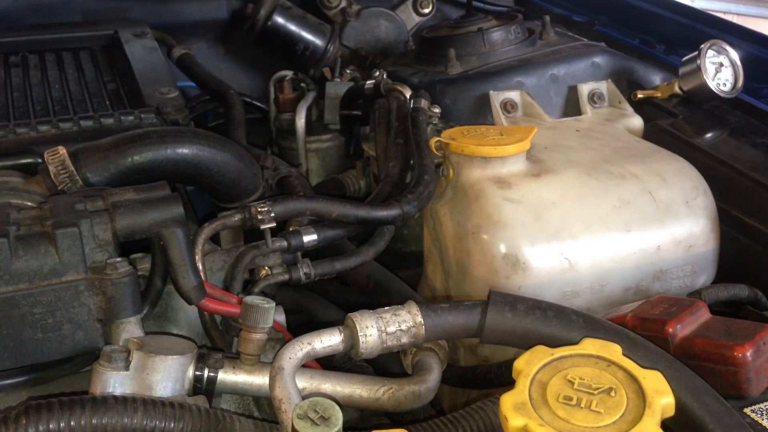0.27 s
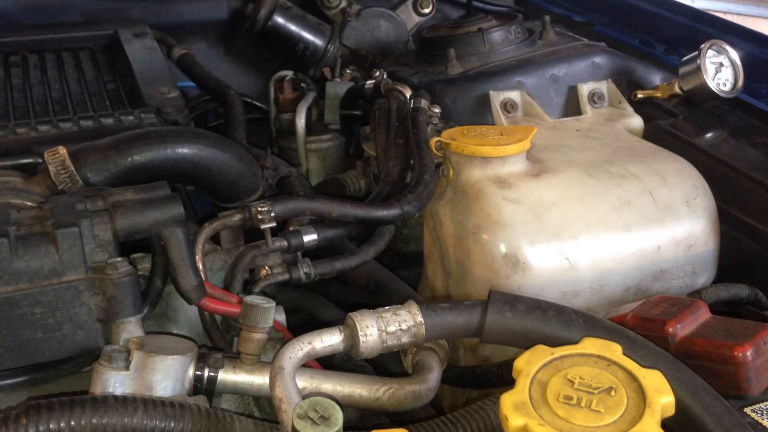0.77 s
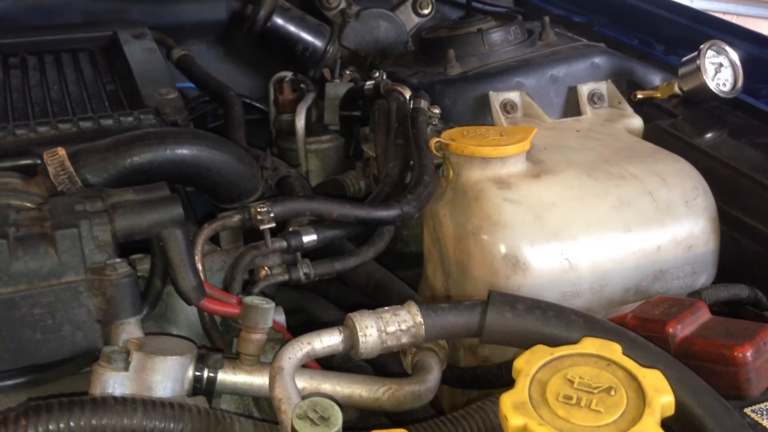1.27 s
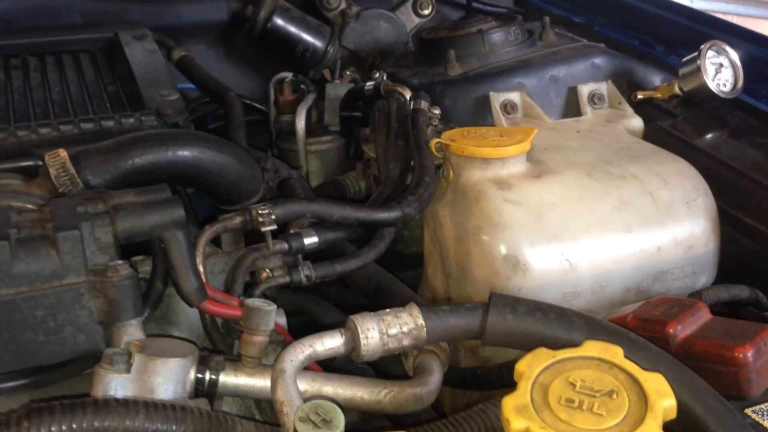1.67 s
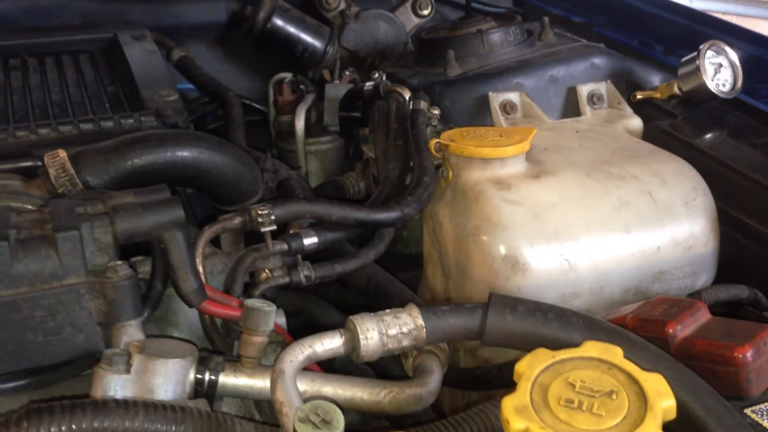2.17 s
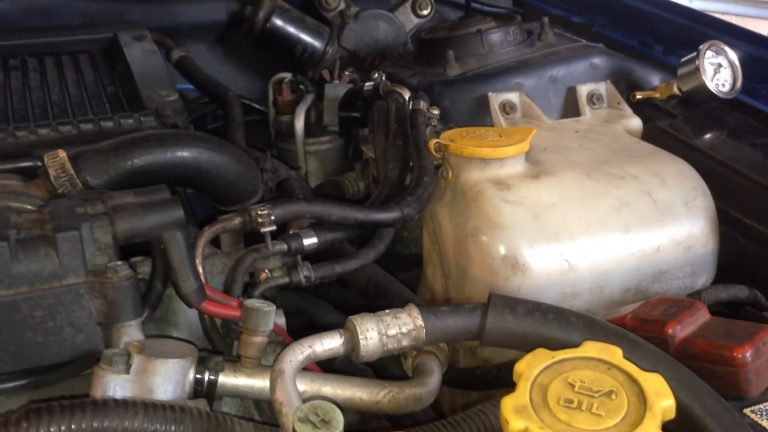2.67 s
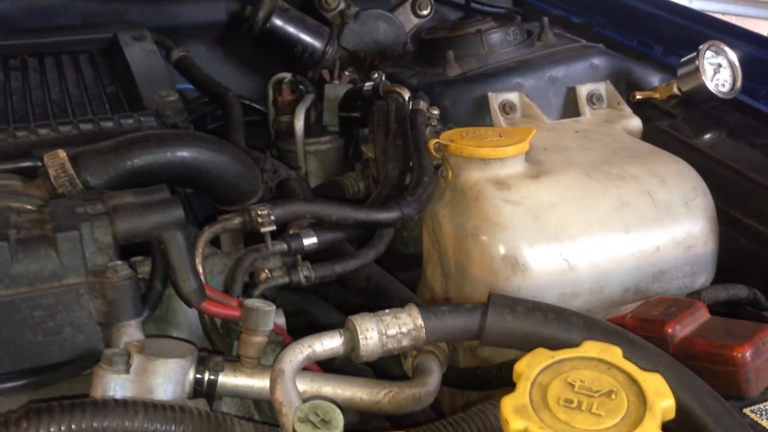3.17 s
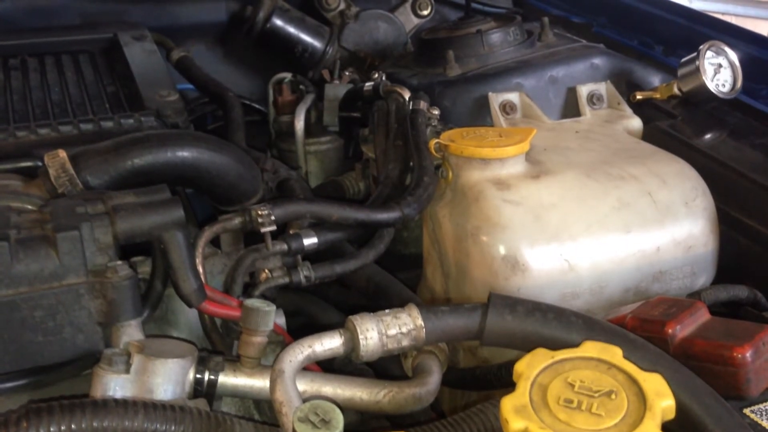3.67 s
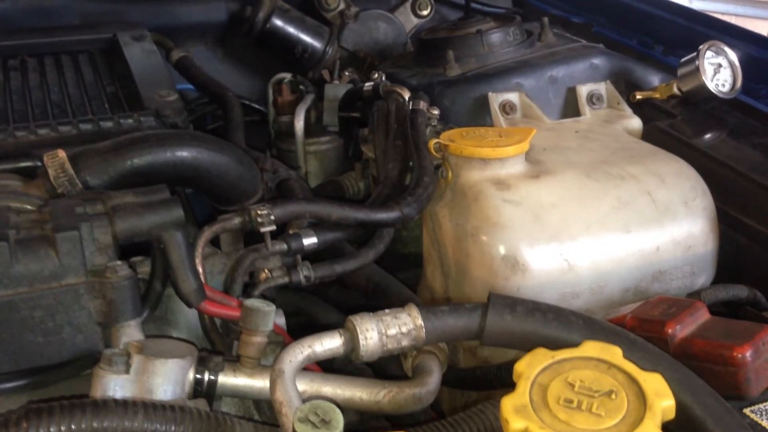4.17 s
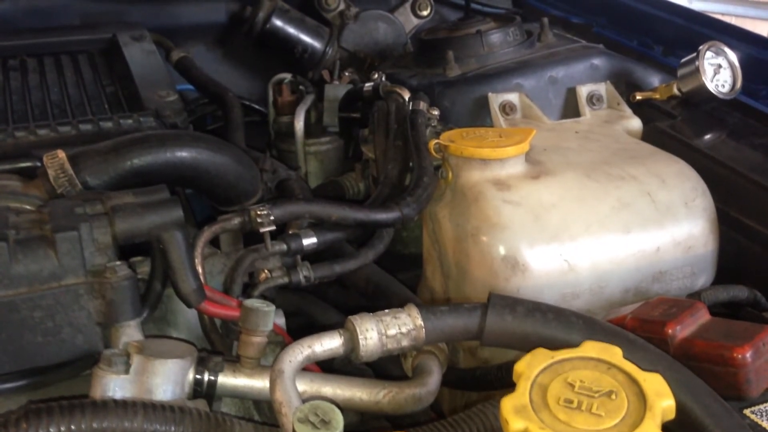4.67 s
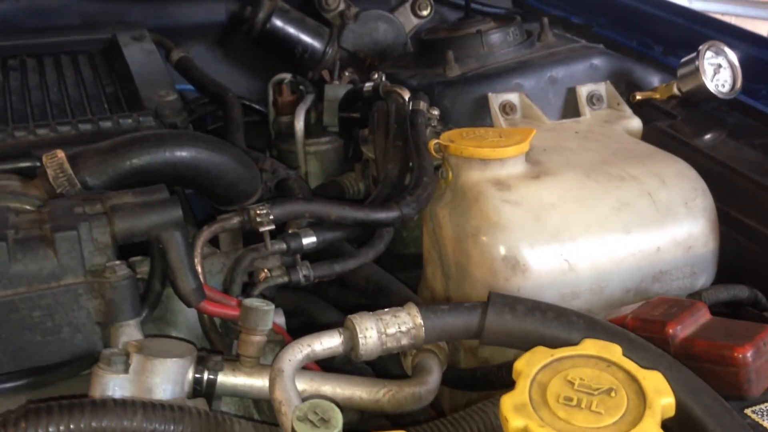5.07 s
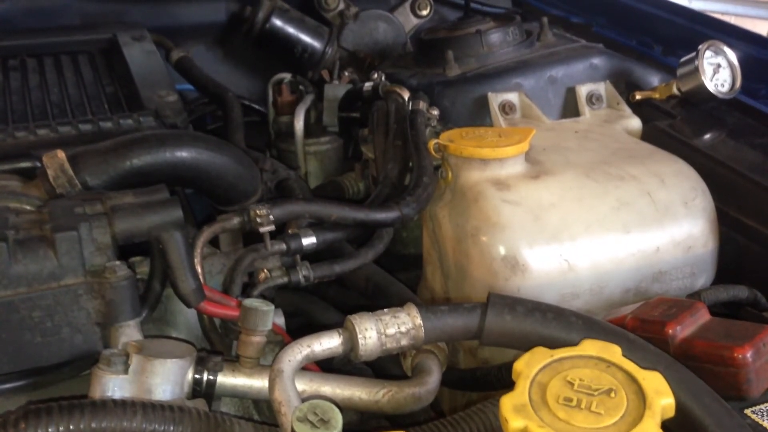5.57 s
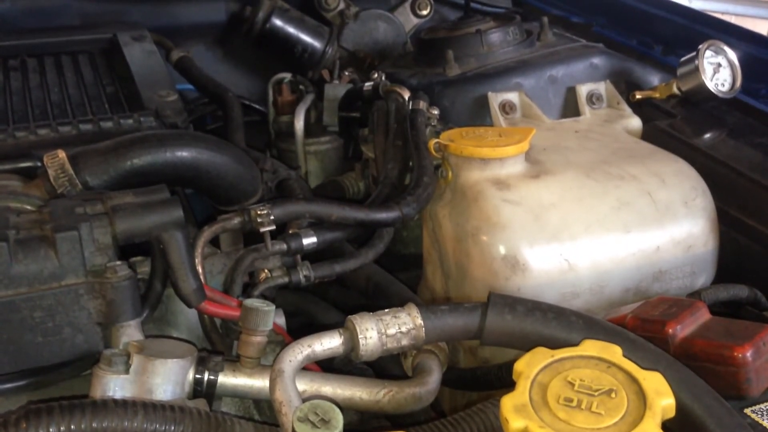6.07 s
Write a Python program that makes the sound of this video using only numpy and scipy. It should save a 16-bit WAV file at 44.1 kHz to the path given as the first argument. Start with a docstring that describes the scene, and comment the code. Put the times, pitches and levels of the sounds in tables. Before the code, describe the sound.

Close in an open engine bay, harsh metallic cranking pulses about six times a second without catching, squeaks a little, then stops.

```python
"""Cranking a car engine that never fires

A starter motor cranks the engine, heard from the open engine bay in a garage. Past each compression
the crank runs ahead: the gears knock across their slack (enveloped impacts), then grind as the motor
takes up the load again (tooth harmonics and scrape noise, coloured by casing rings). Block, body shell
and squeals join in; at the end the pinion lets go and the motor coasts down over the still garage."""
import sys
import numpy as np
from scipy import signal
from scipy.io import wavfile
from scipy.ndimage import uniform_filter1d

SR = 44100
rng = np.random.default_rng(int(sys.argv[2]) if len(sys.argv) > 2 else 0)


def store_pcm(level_fs):
    """Save levels as 16-bit WAV."""
    pcm = np.round(np.clip(level_fs, -1, 1) * 32767).astype(np.int16)
    wavfile.write(sys.argv[1], SR, np.atleast_2d(pcm).T)


N = 278786  # samples

# The compressions. Each row: start in seconds, then nominal levels of knock, grind and block rumble in dB.
COMPRESSIONS = [(.733, -15.5, -14.5, -21), (0.9142, -12.5, -14, -20), (1.084, -14, -16.5, -23.5),
                (1.2546, -16, -15.5, -21.5), (1.4201, -15.5, -14, -21.5), (1.5872, -14.5, -16.5, -22.5),
                (1.7511, -16, -14.5, -22.5), (1.9176, -15.5, -15, -23), (2.0834, -16, -14, -21),
                (2.2471, -13.5, -14, -21), (2.4099, -16.5, -16, -24.5), (2.576, -16, -13.5, -23.5),
                (2.7404, -15, -15, -22), (2.9072, -12.5, -14, -21), (3.069, -12.5, -15.5, -23.5),
                (3.2362, -17, -16, -23.5), (3.4054, -17, -15.5, -22.5), (3.5723, -15, -15, -23.5),
                (3.7395, -15, -14, -22.5), (3.9103, -13.5, -14, -21), (4.0773, -16.5, -14.5, -22),
                (4.2479, -16.5, -13.5, -21.5), (4.4126, -13.5, -15.5, -23.5), (4.5871, -14.5, -14, -21),
                (4.7551, -15, -14.5, -21), (4.9236, -14, -14, -22), (5.0926, -13.5, -14.5, -21.5),
                (5.2669, -14, -15, -21.5), (5.4364, -16, -14, -23), (5.6079, -15.5, -15, -21)]
# The motor after the last compression. Each row: time in seconds, grind level in dB, rumble level in dB.
COAST_DOWN = [(5.686, -30, -30), (5.74, -25, -30.5), (5.79, -33, -40.5), (5.9, -29, -43.5),
              (6.03, -29.5, -51), (6.21, -28, -49.5), (6.32, -31.5, -53)]
TO_FREE_S, FREE_S = 5.74, 5.95  # the gear sound changes to free coasting between these times


def compression_cycle(t):
    """Cyclic loading: each compression slows the crank and loads the teeth, then the crank runs ahead."""
    teeth_per_compression = 193.0  # flywheel teeth that pass
    loaded_s, ease_s = 0.067, 0.0073  # the teeth bear hard, then the load eases off
    bite_s, slack_db, fade_db_per_s = 0.032, -2.5, -190  # the grind grows until the teeth bite, then fades
    light_db, light_db_per_s = -8.5, -17.5  # light grind relative to the row
    rumble_db_per_s = -105  # the block rumble dies after each knock
    # Crank speed within a cycle. Each row: seconds after the start, share of the mean speed.
    speed_course = [(0, 1.18), (.04, 1.015), (.062, .975), (.09, .91), (.13, .945), (.17, .98)]
    start, _, row_db, block_db = np.transpose(COMPRESSIONS)
    beat = np.maximum(np.searchsorted(start, t) - 1, 0)
    since = t - start[beat]
    gap = np.gradient(start)[beat]
    load = np.interp(since, [loaded_s, loaded_s + ease_s], [1, 0])
    growing_db = slack_db * (1 - since / bite_s)
    hard_db = np.where(since < bite_s, growing_db, fade_db_per_s * (since - bite_s))
    eased_db = light_db + light_db_per_s * (since - loaded_s)
    grind_db = row_db[beat] + load * hard_db + (1 - load) * eased_db
    hz = teeth_per_compression / gap * np.interp(since, *np.transpose(speed_course))
    return [grind_db, block_db[beat] + rumble_db_per_s * since, hz, load]


def motion():
    """Drive kinematics: spin-up, compressions and coast set levels, tooth rate in Hz, load and whine."""
    # The motor spinning up. Each row: time in seconds, grind level in dB, rumble level in dB,
    # tooth rate in Hz, load from 0 to 1.
    spin_up = [(.166, -31, -29, 614, 1), (.2, -19.5, -27, 655, 1), (.251, -30, -34.5, 707, 0.03),
               (.35, -27, -37.5, 788, 0.04), (.4, -31.5, -38, 834, 0), (0.432, -33, -39, 914, 0),
               (.446, -29, -31.5, 1105, .6), (.535, -17.5, -37, 1121, 0.94), (.6, -21, -30, 989.6, 1),
               (.635, -26.5, -38, 955, 0.14), (.724, -31, -37.5, 982, 0.15)]
    coast_hz, coast_hz_per_s = 1137, -880
    heave_db, loaded_db, light_db, free_db = -3.5, -7.5, -14, -7  # tooth whine relative to the scrape
    t = np.arange(N) / SR
    first_s = COMPRESSIONS[0][0]
    s, *columns = np.transpose(spin_up)
    spin = [np.interp(t, s, c) for c in columns]
    s, *columns = np.transpose(COAST_DOWN)
    coast = [np.interp(t, s, c) for c in columns]
    coast.append(coast_hz + coast_hz_per_s * np.maximum(t - TO_FREE_S, 0))
    coast.append(0.23 * (t < TO_FREE_S))  # a light load until the change to free coasting
    joined = np.where(t < first_s, spin, np.where(t < s[0], compression_cycle(t), coast))
    grind_db, rumble_db, hz, load = uniform_filter1d(joined, size=200, axis=1)
    hard_whine_db = np.where(t < first_s, heave_db, loaded_db)
    light_whine_db = np.where((t > first_s) & (t < s[0]), light_db, free_db)
    whine_db = load * hard_whine_db + (1 - load) * light_whine_db
    return grind_db, rumble_db, hz, load, whine_db


def gears(hz, load, whine_db):
    """Gear meshing: uneven harmonics of the tooth rate in a scrape that swells with each tooth."""
    # Spectra under hard load, under light load and coasting. Each row: frequency in Hz, relative
    # level in dB per Hz before the casing rings.
    loaded_colour = [(710, -10.5), (1200, -5), (1370, 2.5), (2370, 2), (3070, 0.5), (3500, 2), (5880, 4),
                     (6490, 5), (7030, 6), (11600, 2.5), (13100, -39.5)]
    light_colour = [(710, -19.5), (1200, -15), (1270, -7.5), (1590, 2), (1840, 1), (2140, 2.5), (2810, -5),
                    (3230, 0.5), (3710, -2.5), (4310, 4.5), (7770, 0), (11400, 2), (13100, -19.5)]
    free_colour = [(710, -36), (1200, -17), (2950, -16.5), (3710, -12), (4020, -15), (4580, -10.5),
                   (6300, -14.5), (8010, -11), (8680, -14.5), (10800, -9.5), (13100, -32)]
    turns = np.cumsum(hz * (1 + .012 * wander(70))) / SR  # in tooth periods
    teeth = np.zeros(N)
    for k in range(1, 12):
        teeth += min(k / 4, 1) * gain_of(3.0 * wander(160)) * np.cos(2 * np.pi * k * turns)
    free = np.interp(np.arange(N) / SR, [TO_FREE_S, FREE_S], [0, 1])
    scrape = patchy(rattle(12000, 2.3), 1.7) * (1 + 0.056 * np.cos(2 * np.pi * turns))
    tooth_gain = (1 - .6 * free) * gain_of(whine_db + 1.2 * wander(900))
    drive = scrape + tooth_gain * evened(teeth)
    drive /= np.sqrt(1 + gain_of(whine_db) ** 2)
    load = np.clip(load, 0, 1)
    # square roots crossfade the power between the three contacts
    loaded = coloured(np.sqrt(load) * drive, loaded_colour, 3.3)
    light = coloured(np.sqrt((1 - load) * (1 - free)) * drive, light_colour, 0.86)
    uneven = drive * gain_of(1.65 * wander(500))
    coasting = coloured(np.sqrt((1 - load) * free) * uneven, free_colour, 1.23)
    return loaded + light + coasting


def whine(hz, load):
    """Resonance crossing: a lightly loaded tooth order sings at each ring; the freed armature hums."""
    singing = 4  # tooth order
    # Rings it crosses. Each row: frequency in Hz, width in Hz, nominal peak gain in dB.
    sung_rings = [(3310, 80, -24), (3650, 400, -34), (4470, 150, -28)]
    # The coasting armature. Each row: order of the tooth rate, start in seconds, end in seconds,
    # mean level in dB.
    armature = [(1, 5.99, 6.32, -46.5), (2, 5.88, 6.2, -46.5), (5, 5.9, 6.3, -47), (7, 5.86, 6.12, -41)]
    t = np.arange(N) / SR
    turns = np.cumsum(hz * (1 + .006 * wander(150))) / SR
    ring = sum(gain_of(db) / (1 + (2 * (singing * hz - c) / w) ** 2) for c, w, db in sung_rings)
    meshed = (1 - np.clip(load, 0, 1)) * (t < COAST_DOWN[0][0])
    out = meshed * ring * gain_of(2.5 * wander(250)) * np.sin(2 * np.pi * singing * turns)
    for order, start, end, db in armature:
        swell = np.interp(t, [start, start + 0.032, end - .04, end], [0, 1, 1, 0])
        out += swell * gain_of(db + 4.0 * wander(220)) * np.sin(2 * np.pi * order * turns)
    return out


def knocks():
    """Impact across the gear slack: contacts under a quick rise and a slower rounded fall."""
    # The pinion thrown in, catching and thrown out. Each row: start in seconds, nominal level in dB.
    pinion = [(0.1638, -17.5), (.1828, -16), (.44, -23), (.4679, -25), (5.691, -18.5), (5.713, -19.5)]
    # Spectrum. Each row: frequency in Hz, relative level in dB per Hz before the casing rings.
    struck_colour = [(710, -36.5), (1200, -6), (2340, -6), (2980, -6), (3900, -5), (4350, -5), (5010, -2),
                     (6240, -5.5), (10900, -2), (11700, -8), (13100, -24.5)]
    peak_s, peak_db = 0.0049, 5.5  # the peak comes after the row's start and above its level
    rise_s, fall_s = 0.0053, 0.012
    envelope, u = np.zeros(N), np.arange(-900, 2600) / SR
    shape = np.exp(-np.where(u < 0, (u / rise_s) ** 2, abs(u / fall_s) ** 1.19))
    for s, db in [row[:2] for row in COMPRESSIONS + pinion]:
        envelope[round((s + peak_s + u[0]) * SR):][:len(u)] += gain_of(db + peak_db) * shape
    return coloured(envelope * rattle(9000, 4.9), struck_colour, 4.7)


def thumps():
    """Damped oscillation: the block rocks on its mounts in short low swings."""
    # Each row: time in seconds, envelope peak in dB, frequency in Hz.
    swings = [(0.1719, -18, 304), (0.1835, -12.5, 289), (.458, -32, 242), (0.479, -33, 237),
              (.756, -23, 270), (.935, -22, 226), (1.095, -21, 256), (1.781, -25, 328), (1.93, -22.5, 177),
              (2.107, -24, 246), (2.259, -19, 364.5), (2.587, -30, 183), (2.749, -23, 277),
              (2.918, -19, 252), (3.248, -23, 181), (3.433, -19.5, 245), (3.587, -16, 237),
              (3.93, -22.5, 188), (4.109, -22.5, 316.6), (4.261, -14.5, 307), (4.603, -18, 357.6),
              (4.781, -19.5, 259), (4.934, -15, 298.8), (5.118, -21, 241), (5.279, -25, 184.3),
              (5.621, -19, 189), (5.696, -34, 316), (5.714, -22, 194)]
    out, u = np.zeros(N), np.arange(-400, 2400) / SR
    shape = np.where(u < 0, np.exp(-(u / 0.0022) ** 2), np.exp(-u / 0.0074))
    for (s, db, hz), turn in zip(swings, rng.random(len(swings))):
        swing = np.sin(2 * np.pi * (hz * u + turn))
        out[round((s + u[0]) * SR):][:len(u)] += gain_of(db) * shape * swing
    return out


def block(rumble_db, started):
    """Low cut: rumble and thumps of the block, thinned at the lowest pitches as by a microphone's low cut."""
    # Spectrum. Each row: frequency in Hz, relative level in dB per Hz before the casing rings.
    block_colour = [(59, -48), (110, -13), (177, -4.5), (259, -1), (447, -3.5), (544, -3.5), (597, -1),
                    (1010, -2), (1090, -3), (1210, -8.5), (1600, -17), (2080, -42), (3520, -120)]
    contacts = patchy(rattle(2500, 2.3), 2.12)
    rumble = coloured(started * gain_of(rumble_db) * contacts, block_colour, 6.8)
    low_cut = signal.butter(4, 121, "high", fs=SR, output="sos")  # Hz
    return signal.sosfilt(low_cut, rumble + thumps())


def growl():
    """Harmonic series: a rough stack swells, sags in pitch and dies as the crank first heaves over."""
    peak_s, level_db, peak_hz, hz_per_s = .57, -29, 218, -165
    swell_db_per_s, fade_s = 192, 0.043
    # Each entry: mean relative level in dB of one harmonic, from the first upward.
    harmonics = [-6, 1, -9, 4.5, -5]
    late = np.arange(N) / SR - peak_s
    hz = (peak_hz + hz_per_s * np.clip(late, -1, 1)) * (1 + 0.01 * wander(200))
    turns = np.cumsum(hz) / SR
    stack = np.zeros(N)
    for k, db in enumerate(harmonics, 1):
        stack += gain_of(db + 2.5 * wander(333)) * np.sin(2 * np.pi * k * turns)
    swell = gain_of(swell_db_per_s * np.minimum(late, 0))
    fade = np.exp(-(np.maximum(late, 0) / fade_s) ** 2)
    return gain_of(level_db) * swell * fade * stack


def squeals_and_hums():
    """Frequency modulation: short gliding tones waver, with a second harmonic and a scratchy level."""
    # First two glides of a singing tooth order, then brief squeals of a slipping contact, then low
    # hums as the crank settles. Each row: start in seconds, length in seconds, first Hz, last Hz,
    # nominal rms level of the fundamental in dB.
    glides_and_squeals = [(0.588, 0.038, 3170, 3440, -29), (0.628, 0.064, 3400, 3980, -35),
                          (3.962, 0.03, 7010, 7150, -21.5), (4.448, .027, 6880, 6850, -21),
                          (4.63, .036, 7130, 7200, -23), (4.755, 0.024, 7190, 7050, -24),
                          (4.966, .052, 7080, 7200, -21), (5.126, .02, 6800, 6850, -26),
                          (5.308, 0.032, 7100, 7100, -19), (5.336, 0.043, 7120, 7200, -19),
                          (5.415, 0.035, 7200, 7080, -23), (5.493, .035, 7230, 7100, -26),
                          (5.75, .042, 7200, 7160, -29.5), (5.85, 0.035, 5470, 5650, -25),
                          (5.87, .045, 5550, 4970, -26), (5.899, .04, 4830, 4170, -30),
                          (5.991, 0.019, 7000, 7000, -28), (5.997, .02, 7900, 8000, -29),
                          (6.051, .016, 6950, 7100, -25)]
    settling = [(5.9, 0.11, 234, 226, -50), (5.955, 0.022, 348, 317, -42), (6.22, 0.17, 143.3, 149, -50),
                (6.27, 0.069, 327, 341, -48)]
    out, waver, scratch = np.zeros(N), wander(60), gain_of(1.5 * wander(120))
    for s, length, first_hz, last_hz, db in glides_and_squeals + settling:
        begin, count = round(s * SR), round(length * SR)
        part = out[begin:][:count]
        glide = np.linspace(first_hz, last_hz, len(part))
        phase = 2 * np.pi * np.cumsum(glide * (1 + .004 * waver[begin:][:len(part)])) / SR
        fade = signal.windows.tukey(count, .7)[:len(part)]
        part += gain_of(db) * np.sqrt(2) * fade * (np.sin(phase) + 0.59 * np.sin(2 * phase))
    return out * scratch


def body_shake():
    """Forced vibration: low coloured noise for the body shell shaking."""
    # Spectrum. Each row: frequency in Hz, relative level in dB per Hz.
    shake_colour = [(13, -38), (22, -17), (54, 8), (86, 7), (110, -14.5), (140, -27), (240, -120)]
    # Each row: time in seconds, level in dB.
    shake_course = [(.16, -89), (.75, -55), (5.7, -55), (6.0, -66)]
    level_db = np.interp(np.arange(N) / SR, *np.transpose(shake_course))
    return gain_of(level_db) * coloured(rng.standard_normal(N), shake_colour, -21)


def key_click():
    """Low-pass transmission: the key turns far off in the cabin, a dulled decaying noise burst."""
    key_s, key_db = .104, -43  # level at the onset, ahead of the dulling
    t = np.arange(N) / SR
    decay = np.exp(-np.maximum(t - key_s, 0) / 0.0068) * (t > key_s)
    dulling = signal.butter(2, 1600, fs=SR, output="sos")  # Hz
    return signal.sosfilt(dulling, gain_of(key_db) * decay * rng.standard_normal(N))


def bay(x, t60):
    """Reverberation: sparse reflections from bonnet and walls fall 60 dB in t60 seconds."""
    at = np.arange(100, 12000, 22) + rng.integers(0, 22, 541)
    taps = np.zeros(12100)
    taps[at] = rng.choice([-1., 1.], len(at)) * gain_of(-60 * at / SR / t60)
    return signal.oaconvolve(x, taps / np.linalg.norm(taps))[:N]


def still_garage():
    """Stationary ambient noise: the still air of the garage."""
    # Spectrum. Each row: frequency in Hz, relative level in dB per Hz.
    air_colour = [(18, -70), (30, -36), (63, -11), (85, -3), (99, -19), (141, 4), (478, -12.5), (1260, -26),
                  (10300, -24), (13000, -25)]
    return gain_of(-52.5) * coloured(rng.standard_normal(N), air_colour, -30)


def gain_of(db):
    """Logarithmic level: dB to amplitude gain."""
    return 10 ** (np.asarray(db) / 20)


def evened(x):
    """Power normalization: scales to rms 1."""
    return x / np.sqrt(np.mean(x ** 2) + 1e-20)


def wander(samples):
    """Smoothed randomness: twice averaged noise of rms 1."""
    once = uniform_filter1d(rng.standard_normal(N), samples)
    return evened(uniform_filter1d(once, samples))


def rattle(per_s, spread_db):
    """Random impulse train: dense metal contacts of random sign, a few of them large."""
    hit, big, side = rng.random((3, N))
    size = gain_of(-spread_db * np.log(big + 0.068))
    return evened((hit < per_s / SR) * np.sign(side - .5) * size)


def patchy(x, spread_db):
    """Time-varying contact: patches of the spectrum swell and sink at random."""
    z = signal.stft(x, nperseg=256)[2]
    across_hz = uniform_filter1d(rng.standard_normal(z.shape), size=4, axis=0)
    field = uniform_filter1d(across_hz, size=7, axis=1)
    return signal.istft(z * gain_of(spread_db * evened(field)), nperseg=256)[1][:N]


def coloured(x, points, ring_db):
    """Minimum-phase filtering: a causal spectrum with the casing's resonances standing out of it."""
    # Rings of starter and bell housing. Each row: frequency in Hz, width in Hz, peak in dB
    # relative to ring_db.
    casing_rings = [(532, 30, -1.5), (845, 20, -4), (976, 11, 2), (1211, 40, 2), (1924, 40, 3),
                    (2117, 26, 2), (2390, 36, 1), (3310, 56, 1), (3612, 45, 2), (3890, 90, 3),
                    (4155, 50, 1), (4428, 70, 1.5), (4882, 40, 1), (5847, 40, 1), (6916, 40, 1),
                    (7149, 70, 1), (7560, 38, 0), (8839, 70, 1), (9434, 70, 1), (11256, 60, 1)]
    hz = abs(np.fft.fftfreq(8192, 1 / SR))
    f, db = np.transpose(points)
    rings = sum(gain_of(ring_db + d) ** 2 / (1 + (2 * (hz - c) / w) ** 2) for c, w, d in casing_rings)
    base_db = np.maximum(np.interp(np.log(hz + 1), np.log(f), db), -90)
    log_gain = np.log(gain_of(base_db) * np.sqrt(1 + rings))
    # the Hilbert transform of the log gain gives the minimum phase
    taps = np.fft.ifft(np.exp(np.conj(signal.hilbert(log_gain)))).real[:4096]
    return signal.oaconvolve(x, taps / np.linalg.norm(taps))[:len(x)]


def scene():
    """Superposition: gears, knocks, block and shell with their reflections, over the still garage."""
    grind_db, rumble_db, hz, load, whine_db = motion()
    started = np.interp(np.arange(N) / SR, [.159, .166], [0, 1])
    grind = gain_of(grind_db) * gears(hz, load, whine_db)
    engine = started * (grind + whine(hz, load) + body_shake())
    engine += knocks() + block(rumble_db, started) + growl() + squeals_and_hums()
    reflections = gain_of(-17) * bay(engine, 0.18)
    return (engine + reflections + key_click() + still_garage())[None]


def record(dry):
    """Soft saturation and band limit: the input stage rounds off the loudest knocks."""
    taps = signal.firwin(401, 13200, window=("kaiser", 9), fs=SR)  # edge in Hz
    rounded = dry / (1 + (abs(dry) / .8) ** 4) ** .25
    return signal.oaconvolve(rounded, taps[None], "same")


dry = scene()
out = record(dry)
store_pcm(out)
```